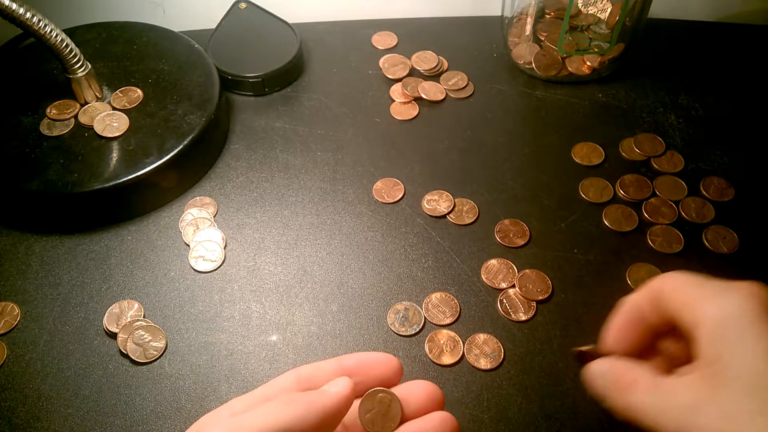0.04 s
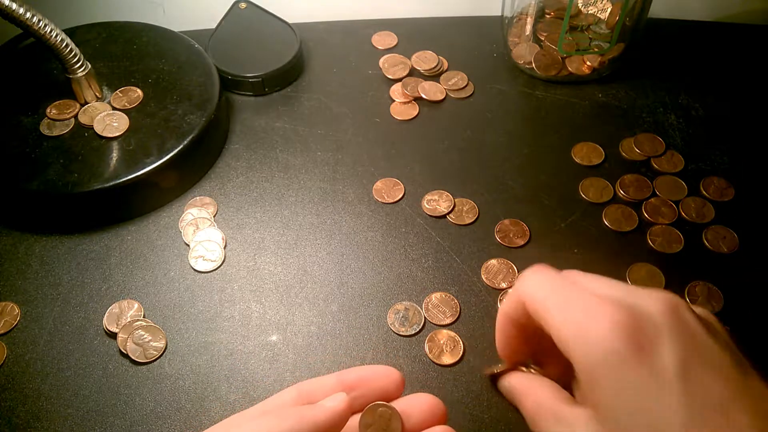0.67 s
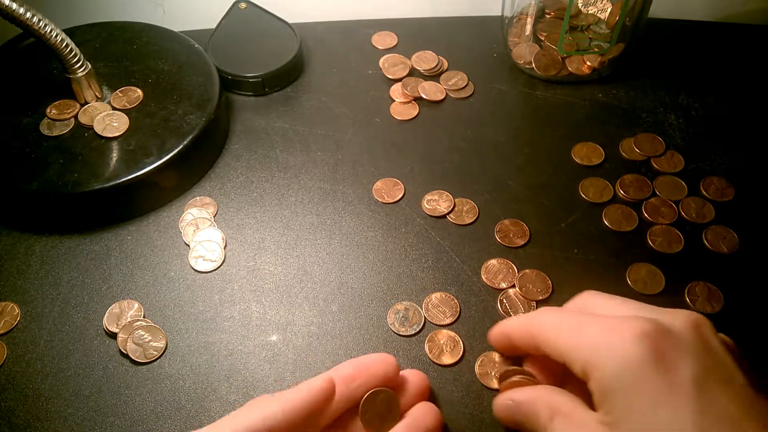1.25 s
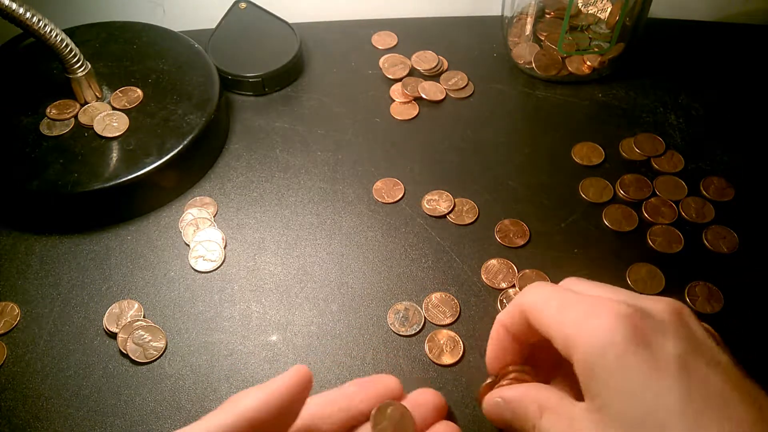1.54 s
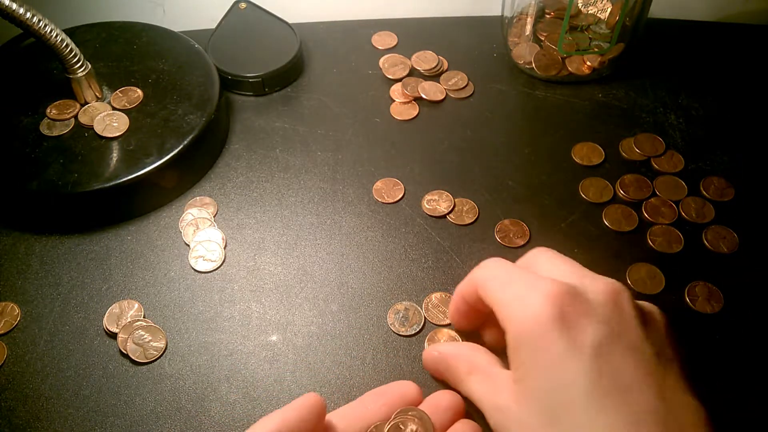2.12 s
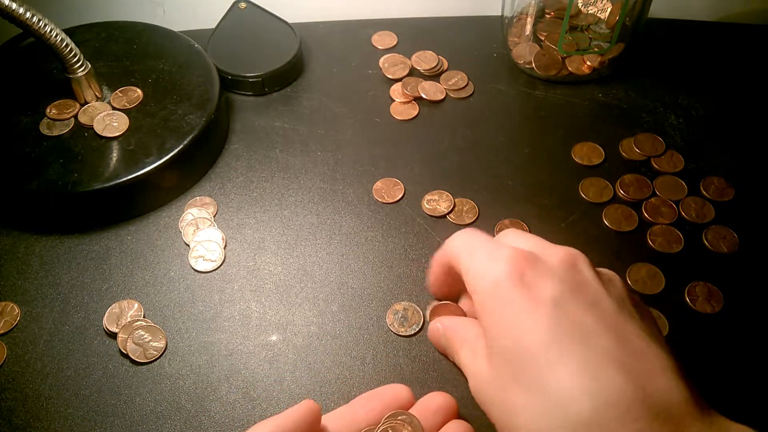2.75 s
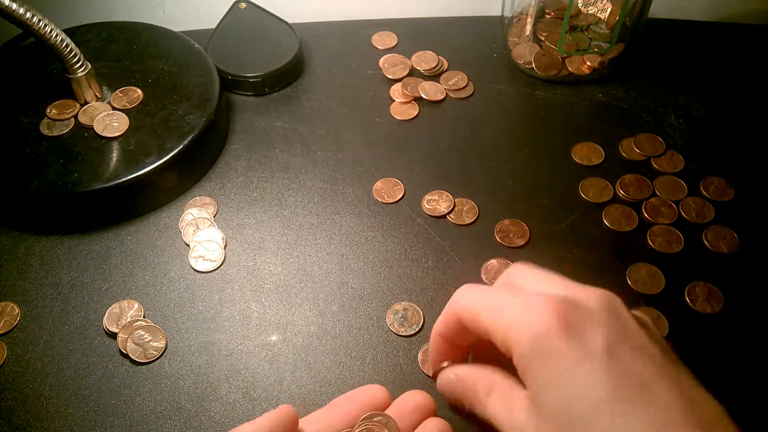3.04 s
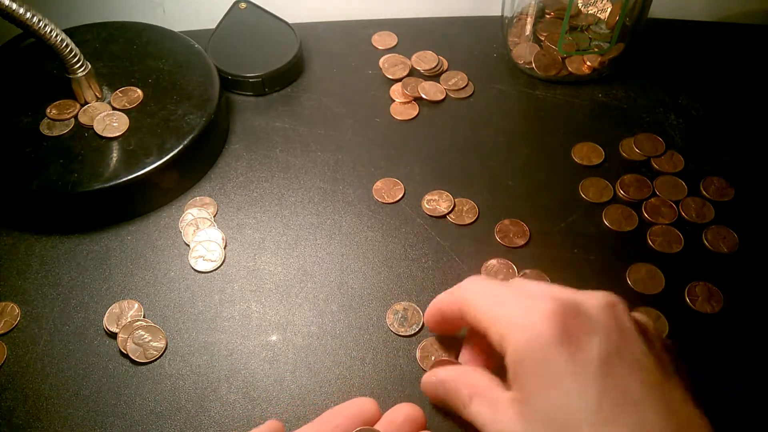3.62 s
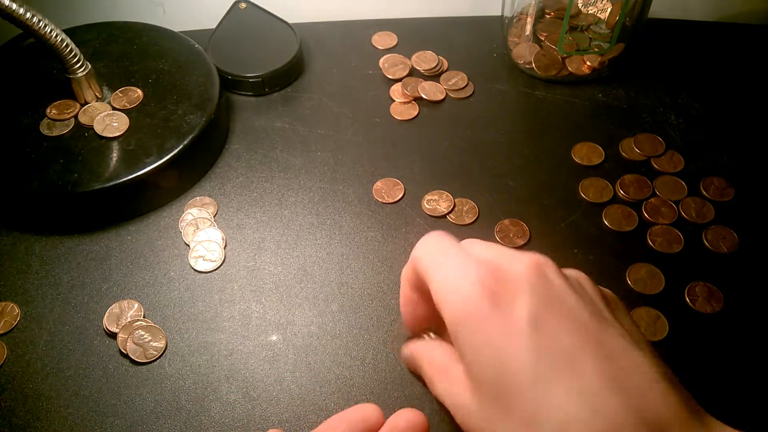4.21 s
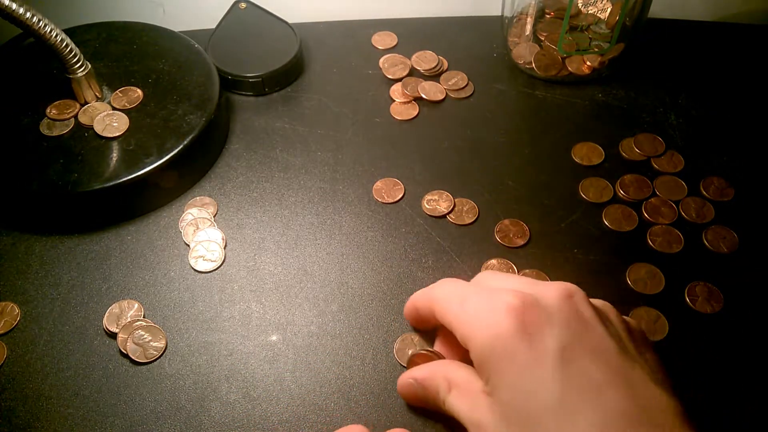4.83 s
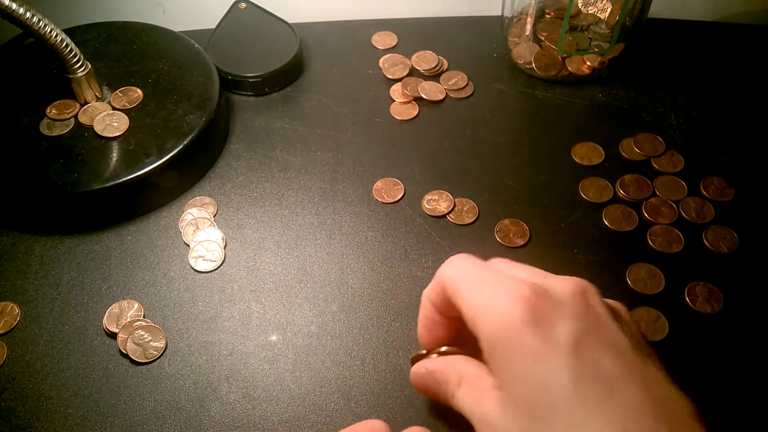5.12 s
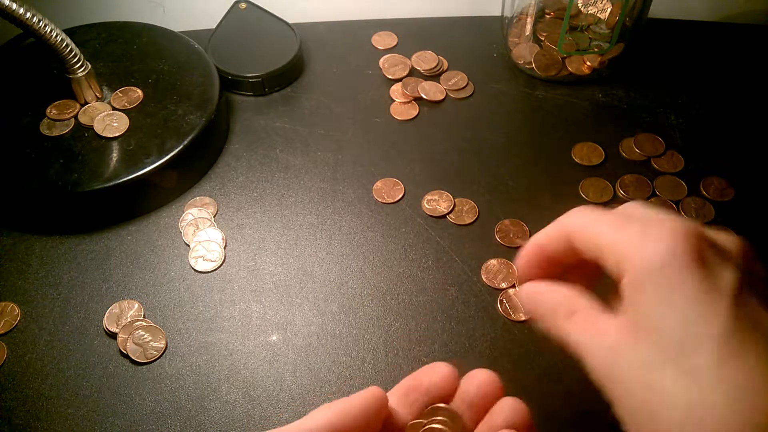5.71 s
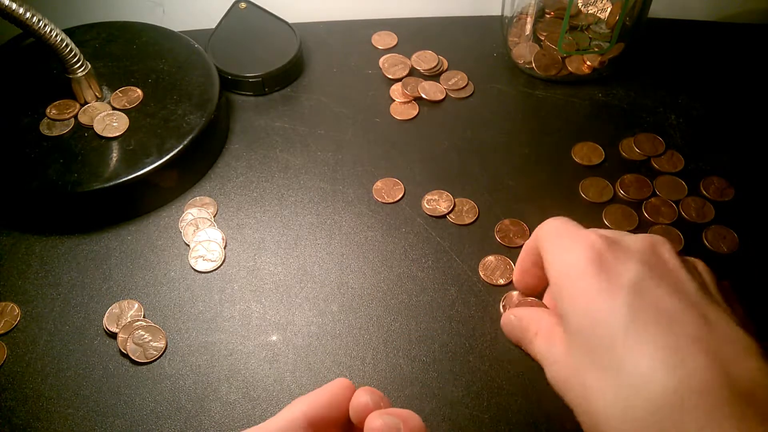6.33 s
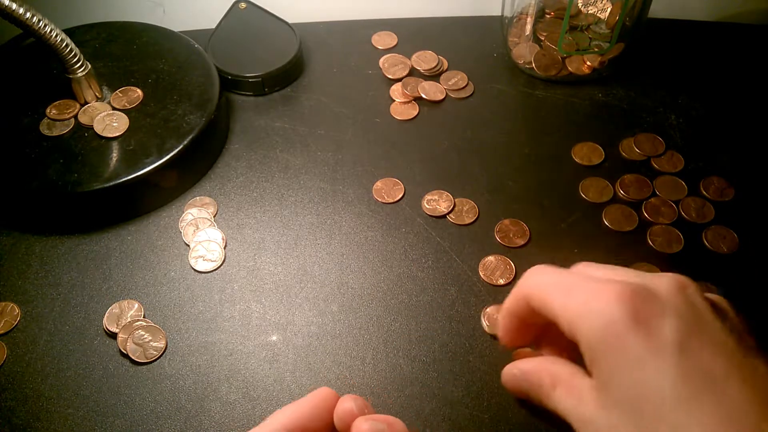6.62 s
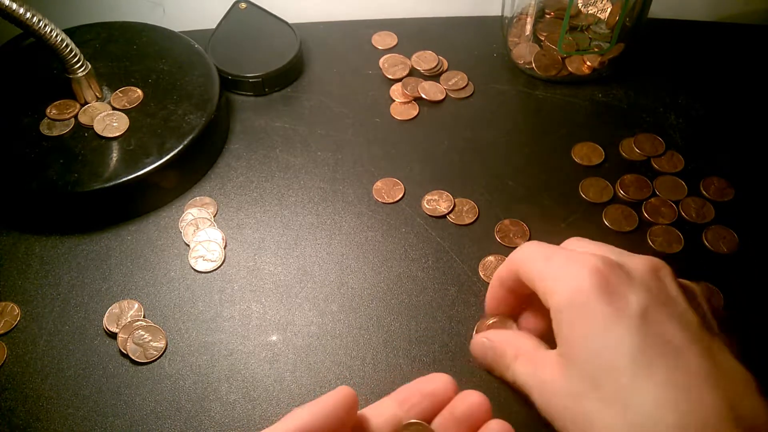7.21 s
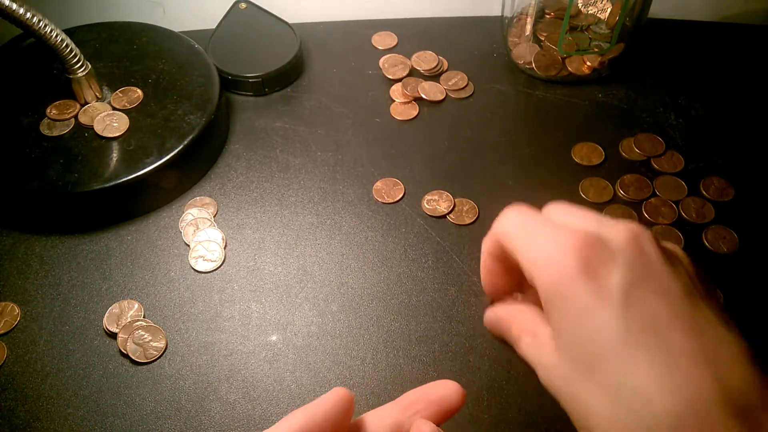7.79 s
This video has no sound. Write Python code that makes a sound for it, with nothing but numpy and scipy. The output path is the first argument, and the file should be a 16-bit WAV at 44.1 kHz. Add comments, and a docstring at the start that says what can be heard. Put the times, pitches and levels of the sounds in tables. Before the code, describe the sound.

Coins are gathered from a hard tabletop, heard close up in a quiet room. Sharp taps open, and a loose coin wobbles ever faster until about 0.5 seconds. Scrapes and a strong click follow near 0.8, then faint dry ticks and more taps. At 1.9 a coin drops onto others in the palm with a short, damped clink. After soft sliding, clicks and scrapes cluster around 3 seconds and again from 3.7 to 4.4, leading into a second quickening wobble until 4.7. More taps come just after 5, and a brighter clink in the palm at 5.6. Taps and drags resume at 6; after a strong click at 6.6, a coin spins down in a gritty whirr until 7.2. Last scrapes and taps end near 7.8. Throughout, coins clink lightly between the fingers, and the hand softly rubs and bumps the table over faint rumble, hum and hiss.

```python
"""Coins tap and scrape on a hard tabletop as a hand gathers them, close by in a quiet room.
Impacts excite the modes of the top and click at the rim; stick-slip friction makes the scrapes.
Two loose coins wobble ever faster, and one spins down in a gritty whirr. Coins clink in the fingers
and twice drop onto others in the palm, where skin damps their ring. The hand rubs and bumps the
table and its grip ticks, over room rumble, a faint hum and hiss."""
import sys
import numpy as np
from scipy import signal
from scipy.fft import rfft, irfft, next_fast_len
from scipy.io import wavfile
from scipy.ndimage import map_coordinates

SR = 44100
rng = np.random.default_rng(int(sys.argv[2]) if len(sys.argv) > 2 else 0)


def file_out(sig):
    """Save sig as 16-bit WAV at sys.argv[1]."""
    # one column per channel
    cols = np.atleast_2d(sig).T
    # limit, then scale
    lim = np.clip(cols, -1, 1)
    pcm = np.round(lim * 32767).astype(np.int16)
    wavfile.write(sys.argv[1], SR, pcm)


N = 346626

# spectrum of a rim clicking on the top: f/Hz, level/dB
RIM_SPECTRUM = [(900, -10.5), (1800, 4.5), (2300, -5.5), (2650, -4.5), (2950, -2), (3200, -1.5), (3850, 3),
                (4800, -3.5), (5300, -1.5), (6100, -2), (6600, -8), (7400, -21.5), (9500, -30.5),
                (15000, -55)]
# spectrum of the finest part of a hard contact: f/Hz, level/dB
SIZZLE_SPECTRUM = [(5000, -25), (7600, -1), (9500, -3), (13300, 0), (15500, -3)]
# spectrum of skin sliding on the top: f/Hz, level/dB
SKIN_SPECTRUM = [(50, -6), (110, -3), (170, -1.5), (280, -4.5), (400, -14), (600, -14), (1500, -40),
                 (5000, -66.5)]
USUAL_SCRAPE_DB = -34.5


def taps():
    """Impact: coins tip onto the top, with a flat knock (hardness < 0) or a rim click (hardness > 0)."""
    # coin impacts: t/s, level/dB, hardness/dB
    impacts = [(.082, -1.5, -8.5), (.117, -7.5, -11.5), (.138, -5, -12), (.228, -4.5, -2),
               (.462, 3.5, -7.5), (.705, -6, -4), (.773, -6.5, -6.5), (.819, 4.5, 1.5), (1.413, -14.5, -2),
               (1.45, -5.5, -3), (1.616, -4, -5), (2.049, -25.5, -3), (2.771, -12, 0), (2.895, -6.5, 4.5),
               (2.955, -1.5, -5.5), (2.975, -2, -3.5), (3.054, -6, 6), (3.091, -3, 1.5), (3.663, -12, -8.5),
               (3.896, -17.5, -4.5), (4.162, -14, 2), (4.281, 0, -5), (4.34, 2, 2), (4.358, -1.5, -1),
               (5.012, -19.5, 6.5), (5.037, -9, 1), (5.098, -25.5, 3.5), (5.14, -13, -1), (5.166, -3.5, -3),
               (6.087, -2, -4.5), (6.284, -5.5, -2.5), (6.306, -7.5, -5.5), (6.486, -6, -4.5),
               (6.565, -0.5, -3.5), (6.588, 4, -.5), (7.273, -6, -5), (7.444, -21, -7), (7.602, -6.5, -2),
               (7.618, -13.5, -0.5)]
    return mixed(part for row in impacts for part in strike(*row))


def strike(s, level_db, hardness_db, scuff_s=.0065, scuff_db=-10, sizzle_db=-33):
    """Impulse excitation, as (time, sound) parts: a rim scuffs, knocks the top and rebounds in clicks."""
    knock_db, click_db = level_db - hardness_db, level_db + hardness_db
    knock = amp(knock_db) * tabletop(tilt_db=-2, contact_hz=1220)
    click = amp(click_db) * impulse(RIM_SPECTRUM, scatter_db=3)
    sizzle = amp(click_db + sizzle_db) * impulse(SIZZLE_SPECTRUM, scatter_db=3)
    edge = click + sizzle
    rebounds = chatter(bounce=1.66, gap_s=.0011)
    blow = amp(knock_db) * driven(chatter(bounce=.67, gap_s=.002), knock)
    length = int(scuff_s * SR)
    scuff = amp(scuff_db) * unit_energy(rng.standard_normal(length) * np.hanning(length))
    return [(s, room(blow, wet_db=-3.5, early_db=-3)),
            (s, room(signal.fftconvolve(rebounds, edge), wet_db=6, early_db=.5)),
            (s - scuff_s / 2, signal.fftconvolve(scuff, edge + knock[:len(edge)] / 2))]


def chatter(bounce, gap_s, count=3):
    """Elastic rebound: a force pulse is followed by a few more within milliseconds."""
    force = np.zeros(SR // 100)
    force[0] = 1
    times = np.cumsum(rng.uniform(.4, 1.6, count)) * gap_s
    samples = np.minimum((times * SR).astype(int), len(force) - 1)
    force[samples] += bounce * rng.uniform(.22, .52, count)
    return unit_energy(force)


def tabletop(tilt_db, contact_hz, size=4096):
    """Modal superposition: the top's response to a point blow, low-passed by the finite contact time."""
    # modes of the top: f/Hz, bandwidth/Hz, level/dB
    modes = [(294.6, 52, -3), (349, 37, -10), (435, 17, -6.5), (522, 24, 4.5), (581, 89, 2), (698, 46, -9),
             (836, 226, 2.5), (1090, 110, -5.5), (1146, 140, -14), (1443, 75, -6.5), (1504, 190, -17),
             (1855, 77, -1.5), (2010, 350, -3.5)]
    f = np.fft.rfftfreq(size, 1 / SR)
    response = 0
    for hz, width, db in modes:
        gain = amp(db + tilt_db * np.log2(hz / contact_hz) + rng.normal(0, .43))
        response += gain * 1j * f * width / (hz * hz - f * f + 1j * f * width)
    softness = 1 / (1 + 1j * f / contact_hz - (f / contact_hz) ** 2) ** 2
    return unit_energy(irfft(response * softness))


def wobbles():
    """Precession: a coin rolls round on its rim and beats on the top, sooner and weaker each time."""
    # wobbles: start t/s, end t/s, first interval/s, ratio of successive intervals,
    # first beat level/dB, loss per beat/dB, rolling level/dB
    loose_coins = [(0.245, .45, .052, .91, 1, 2, -58), (4.413, 4.744, .058, .88, -6, 0.6, -40.5)]
    parts = []
    for start, end, interval, shrink, level_db, loss_db, roll_db in loose_coins:
        parts += drag(start, end, roll_db, tilt_db=4.5)
        times = start + np.cumsum(np.append(0, interval * shrink ** np.arange(12)))
        for k, s in enumerate(times[times < end]):
            parts += strike(s, level_db - loss_db * k, hardness_db=-.5)
    return mixed(parts)


def spin(grind_db=3, hiss_db=1, rasp_db=2, rasp_hz=10000):
    """Rolling contact: the beats of a coin spinning nearly flat merge into a whirr with a fine rasp."""
    # envelope of the spin: t/s, whirr level/dB, treble level/dB
    envelope = [(6.61, -28, -63), (6.696, -42.5, -91), (6.712, -40, -86), (6.778, -41.5, -92),
                (6.826, -38.5, -70), (6.954, -39.5, -73), (7.06, -43, -94), (7.1, -37.5, -85),
                (7.17, -59, -90)]
    times, whirr_db, treble_db = np.transpose(envelope)
    t = np.arange(N) / SR

    def rolling(body):
        force = friction(times[-1] - times[0], rate_hz=3000, spikiness_db=1.5)
        return mixed([(times[0], room(driven(force, body), wet_db=-4, early_db=-3.5))])

    grind = amp(grind_db) * rolling(tabletop(tilt_db=-4, contact_hz=1640))
    hiss = amp(hiss_db) * rolling(impulse(RIM_SPECTRUM))
    rasp = amp(rasp_db) * rolling(butterworth(impulse(SIZZLE_SPECTRUM), rasp_hz, "high"))
    whirr = amp(np.interp(t, times, whirr_db)) * (grind + hiss)
    return whirr + amp(np.interp(t, times, treble_db)) * rasp


def scrapes():
    """Sliding friction: fingers drag coins across the top, their skin rubbing alongside."""
    # drags: start t/s, end t/s, level/dB, tilt/(dB per octave), low when flat and high on the rim
    strokes = [(0.113, 0.204, -25.5, -1), (0.457, 0.538, -34.5, 9.5), (0.571, 0.774, -41, 0),
               (0.773, 0.902, -30, 6), (0.994, 1.313, -45, -9.5), (1.383, 1.534, -42, -4),
               (1.55, 1.609, -40.5, 3), (2.178, 2.255, -50, 0), (2.436, 2.719, -51.5, -1.5),
               (2.865, 2.938, -40, -4), (2.962, 3.157, -35.5, 4.5), (3.027, 3.054, -21.5, 1.5),
               (3.669, 3.708, -28, -4), (3.749, 3.819, -44, 0.5), (3.916, 4.007, -30.5, -1),
               (4.08, 4.213, -36.5, -1), (4.234, 4.261, -26.5, 1), (4.355, 4.437, -29, -3.5),
               (4.691, 4.88, -40, -11.5), (4.956, 5.083, -35.5, -7), (5.098, 5.257, -41, -10.5),
               (5.949, 6, -48.5, 10.5), (6.291, 6.472, -43, -5), (6.479, 6.496, -29.5, 1.5),
               (7.215, 7.32, -36.5, 0), (7.357, 7.398, -23.5, 3.5), (7.491, 7.547, -33.5, -1),
               (7.576, 7.816, -46.5, -4)]
    parts = []
    for start, end, level_db, tilt_db in strokes:
        skin = driven(friction(end - start, rate_hz=730, spikiness_db=1), impulse(SKIN_SPECTRUM))
        skin_db = -47 + .32 * (level_db - USUAL_SCRAPE_DB)
        parts += drag(start, end, level_db, tilt_db)
        parts.append((start, amp(skin_db) * skin))
    return mixed(parts)


def drag(start, end, level_db, tilt_db, sheen_db=-29):
    """Roughness noise, as (time, sound) parts: coarse catches grind in the top, fine ones hiss at the rim."""
    duration = end - start
    hiss_db = -45.5 + .68 * (level_db - USUAL_SCRAPE_DB) + .79 * tilt_db
    contact_hz = 1520 * 2 ** (min(tilt_db, 0) / 16)  # a coin pressed flat makes longer, duller contacts
    grind = driven(friction(duration, rate_hz=1800, spikiness_db=4), tabletop(tilt_db, contact_hz))
    hiss = driven(friction(duration, rate_hz=3500, spikiness_db=2), impulse(RIM_SPECTRUM, scatter_db=2.5))
    sheen = driven(friction(duration, rate_hz=4100, spikiness_db=12), impulse(SIZZLE_SPECTRUM))
    return [(start, amp(level_db) * room(grind, wet_db=-8, early_db=-2.5)),
            (start, amp(hiss_db) * room(hiss + amp(sheen_db) * sheen, wet_db=-1.5, early_db=-21))]


def friction(duration, rate_hz, spikiness_db, grip_hz=110, grip_db=3.2):
    """Stick-slip: random catches on the grain make a force that swells and fades with the stroke."""
    length = max(int(duration * SR), 64)
    catches = (rng.random(length) < rate_hz / SR) * rng.standard_normal(length)
    spikes = amp(spikiness_db * np.minimum(rng.exponential(size=length), 4))
    position = np.arange(length) * grip_hz / SR
    grip = amp(grip_db * map_coordinates(rng.standard_normal(int(position[-1]) + 4), [position]))
    swell = np.abs(np.sin(np.linspace(0, np.pi, length))) ** (1 / 3)
    return unit_rms(catches * spikes * grip) * swell


def clinks(graze_s=.015):
    """Contact damping: held coins hardly ring; dropped ones ring more as they graze, land and settle."""
    # coins touching between the fingers: t/s, level/dB
    touches = [(.82, -14), (1.451, -23.5), (1.553, -31), (1.617, -27), (2.895, -18), (2.976, -26),
               (3.896, -31.5), (3.951, -24.5), (5.042, -20), (5.175, -24.5), (6.588, -13.5), (7.404, -24.5),
               (7.528, -24), (7.616, -21)]
    # drops into the palm: t/s, level/dB, relative graze level/dB, settling delay/s
    drops = [(1.853, -8, -13.5, 0.061), (5.6132, -5, -7, .091)]
    parts = [clink(s, db, bright_db=-1, ring_db=-12) for s, db in touches]
    for s, db, graze_db, settle_s in drops:
        parts += [clink(s - graze_s, db + graze_db, bright_db=0, ring_db=1),
                  clink(s, db, bright_db=4.5, ring_db=1),
                  clink(s + settle_s, db - 16.5, bright_db=1, ring_db=1)]
    return mixed(parts)


def clink(s, db, bright_db, ring_db, t60_s=.04, split_hz=9000, crack_db=3):
    """Free vibration, as (time, sound): coin cracks on coin, and skin soon damps their close modes."""
    # free modes of the coins: f/Hz, level/dB
    modes = [(5330, -9), (5740, -6), (5890, -4), (6035, 0), (6250, -3), (6440, -4), (6920, -11),
             (11770, -14), (12750, 0), (12930, -3), (13520, -1), (14400, -9)]
    # spectrum of metal striking metal: f/Hz, level/dB
    crack_spectrum = [(1000, 7), (3000, 8), (5500, 28), (9000, 12), (14000, 9)]
    t = np.arange(SR // 6) / SR
    ring = sum(amp(mode_db + rng.normal(0, 2.5)) * np.sin(2 * np.pi * hz * rng.normal(1, .002) * t)
               for hz, mode_db in modes)
    hit = amp(ring_db) * unit_energy(ring * amp(-60 * t / t60_s))
    crack = signal.fftconvolve(chatter(bounce=1, gap_s=.0011), impulse(crack_spectrum))
    add(hit, 0, amp(crack_db) * crack)
    lower = amp(db - bright_db) * butterworth(hit, split_hz, "low")
    upper = amp(db + bright_db) * butterworth(hit, split_hz, "high")
    return s, room(lower + upper, wet_db=4, early_db=2.5)


def finger_rubs(rub_s=.052):
    """Soft-contact friction: a fingertip slips on the top with a short, dull rub."""
    # fingertip drags: middle t/s, level/dB
    rubs = [(2.06, -38), (2.335, -37), (4.112, -26), (4.399, -30), (4.727, -31), (4.997, -33), (5.19, -41),
            (5.962, -36), (6.304, -37), (6.364, -31), (7.216, -29), (7.618, -33)]
    out, skin = np.zeros(N), impulse(SKIN_SPECTRUM)
    for s, db in rubs:
        slips = friction(rub_s, rate_hz=900, spikiness_db=2.5)
        add(out, s - rub_s / 2, amp(db) * room(driven(slips, skin), wet_db=-4.5, early_db=-1.5))
    return out


def table_bumps(sway_hz=46.4, scatter=.068, width_s=.013):
    """Forced vibration: the hand's weight sways the whole table in a low Gaussian pulse."""
    # jolts of the table: middle t/s, level/dB
    jolts = [(0.535, -23), (0.805, -23.5), (1.887, -29.5), (2.757, -20.5), (3.769, -23), (4.123, -17),
             (4.45, -25), (5.206, -26.5), (5.978, -22), (6.331, -27), (6.744, -28), (7.561, -24)]
    out = np.zeros(N)
    t = np.arange(SR // 5) / SR
    centred = t - t.mean()
    envelope = np.exp(-(centred / width_s) ** 2 / 2)
    for s, db in jolts:
        hz = sway_hz * (1 + scatter * rng.standard_normal())
        sway = np.cos(2 * np.pi * hz * centred + rng.uniform(0, 2 * np.pi))
        add(out, s - t.mean(), amp(db) * envelope * sway)
    return out


def grip_ticks(decay_s=.00037, snap_hz=6500, snap_db=-5):
    """Heavy damping: as the grip shifts, two tones die so fast that they are heard as a dry tick."""
    # ticks of the grip: t/s, f/Hz, level/dB
    ticks = [(.973, 5800, -36.5), (1.028, 5600, -39.5), (1.119, 1790, -32.5), (1.132, 3180, -36),
             (1.179, 3100, -35.5)]
    t = np.arange(SR // 5) / SR
    envelope = t / decay_s * np.exp(1 - t / decay_s)
    snap = amp(snap_db) * np.sin(2 * np.pi * snap_hz * t)
    return mixed((s, amp(db) * envelope * (np.sin(2 * np.pi * hz * t) + snap)) for s, hz, db in ticks)


def room(x, wet_db, early_db, early_t60_s=.027, onset_s=.00034):
    """Reverberation: direct sound, scatter from things on the table and a short tail share x's energy."""
    # reverberation times of the room: f/Hz, T60/s
    decay_times = [(150, .26), (450, .19), (1100, .125), (7000, .115), (14000, .09)]
    length = SR // 5
    hz, frame_s, noise = signal.stft(rng.standard_normal(length), SR, nperseg=256)
    decay = amp(-60 * frame_s / along(decay_times, hz)[:, None])
    late = signal.istft(noise * decay, SR, nperseg=256)[1][:length]
    t = np.arange(length) / SR
    early = rng.standard_normal(length) * amp(-60 * t / early_t60_s)
    arrival = 1 - np.exp(-(t / onset_s) ** 2)
    paths = amp(wet_db) * unit_energy(late * arrival) + amp(early_db) * unit_energy(early * arrival)
    paths[0] += 1  # direct path
    return driven(x, paths)


def background(noise_db=-40, hum_hz=97, hum_db=-53):
    """Stationary noise: room rumble and microphone hiss, with a faint machine hum."""
    # noise spectrum of the room at rest: f/Hz, relative density level/dB
    noise_floor = [(20, -8.5), (45, 7.5), (70, -1.5), (100, 1), (135, -4.5), (200, -16), (400, -22.5),
                   (600, -25), (850, -28.5), (1400, -43.5), (2100, -34.5), (4000, -41), (6100, -37),
                   (6700, -49.5), (7600, -59.5), (15000, -57.5)]
    noise = unit_rms(filtered(rng.standard_normal(N), lambda hz: amp(along(noise_floor, hz))))
    hum = np.sqrt(2) * np.sin(2 * np.pi * hum_hz * np.arange(N) / SR)
    return amp(noise_db) * noise + amp(hum_db) * hum


def impulse(spectrum, scatter_db=0, size=2048):
    """Minimum phase: the shortest causal click with this spectrum; scatter varies its colour."""
    spectrum = [(hz, db + scatter_db * rng.standard_normal()) for hz, db in spectrum]
    magnitude = amp(along(spectrum, np.fft.rfftfreq(size, 1 / SR)))
    cepstrum = irfft(np.log(magnitude))
    cepstrum[1:size // 2] *= 2
    cepstrum[size // 2:] = 0
    return unit_energy(irfft(np.exp(rfft(cepstrum))))


def driven(force, body):
    """Convolution with a body's impulse response, scaled to the energy of the force."""
    return np.linalg.norm(force) * unit_energy(signal.fftconvolve(force, body))


def filtered(x, response):
    """Multiply the spectrum by a frequency response."""
    size = next_fast_len(len(x) + 4096)
    return irfft(rfft(x, size) * response(np.fft.rfftfreq(size, 1 / SR)), size)[:len(x)]


def butterworth(x, hz, kind):
    """Fourth-order low-pass or high-pass."""
    return signal.sosfilt(signal.butter(4, hz, kind, fs=SR, output="sos"), x)


def along(points, hz):
    """Interpolate (f/Hz, value) points on a log axis."""
    f, value = np.transpose(points)
    return np.interp(np.log(hz + 1), np.log(f), value)


def amp(db):
    """Decibels to gain."""
    return 10 ** (np.asarray(db) / 20)


def unit_rms(x):
    """Scale to rms 1."""
    return x / np.sqrt(np.mean(x ** 2) + 1e-20)


def unit_energy(x):
    """Scale to a summed square of 1."""
    return x / np.sqrt(np.sum(x ** 2) + 1e-20)


def add(track, s, sound):
    """Mix a sound into the track from time s."""
    start = max(round(s * SR), 0)
    part = track[start:start + len(sound)]
    part += sound[:len(part)]


def mixed(parts):
    """One track from (time, sound) parts."""
    out = np.zeros(N)
    for s, sound in parts:
        add(out, s, sound)
    return out


def scene():
    """Superposition: coins, hand and room add at one microphone."""
    coins = taps() + wobbles() + spin() + scrapes() + clinks()
    hand = finger_rubs() + table_bumps() + grip_ticks()
    return (coins + hand + background())[None]


def record(dry, top_hz=15400):
    """Band limiting: a steep low-pass removes the highest treble."""
    return np.array([filtered(channel, lambda hz: 1 / (1 + (hz / top_hz) ** 160)) for channel in dry])


dry = scene()
out = record(dry)
file_out(out)
```